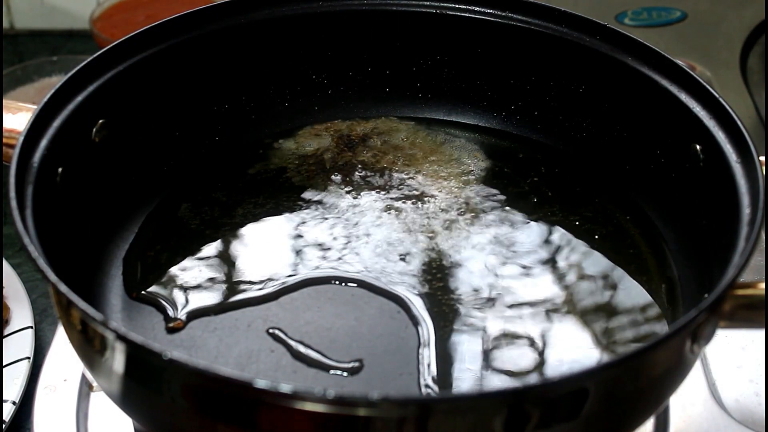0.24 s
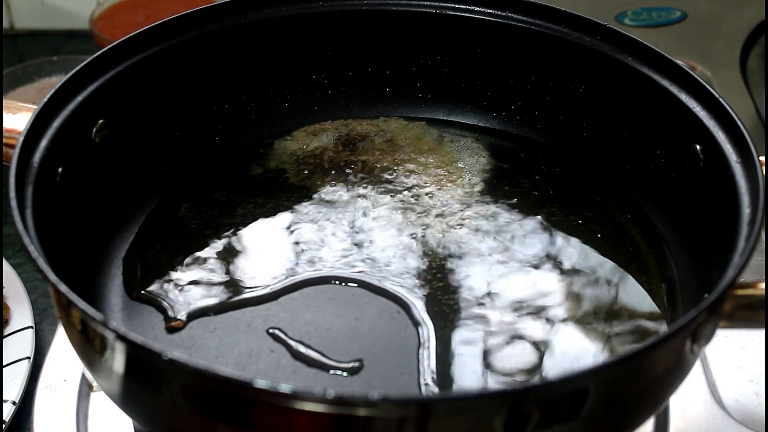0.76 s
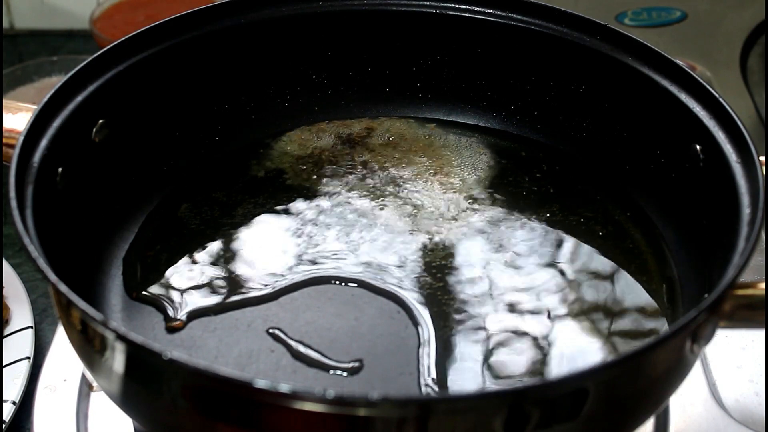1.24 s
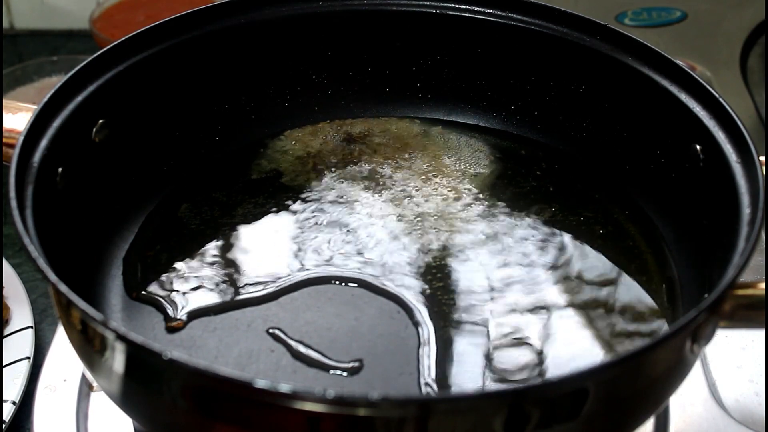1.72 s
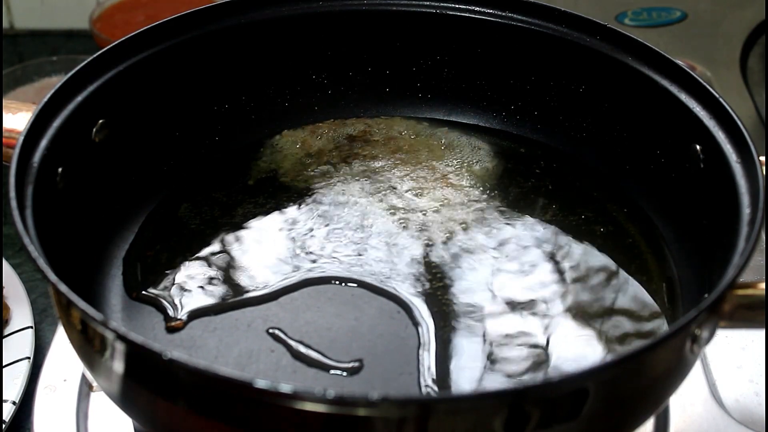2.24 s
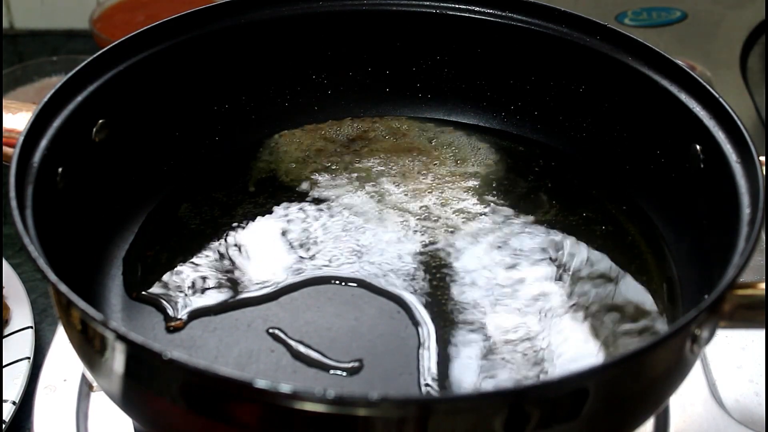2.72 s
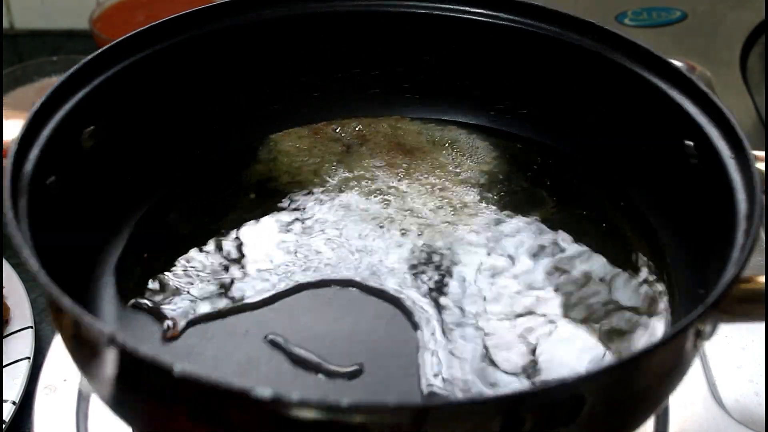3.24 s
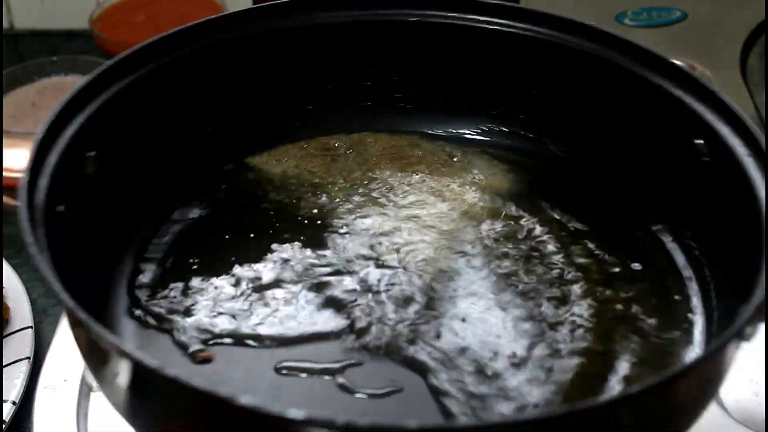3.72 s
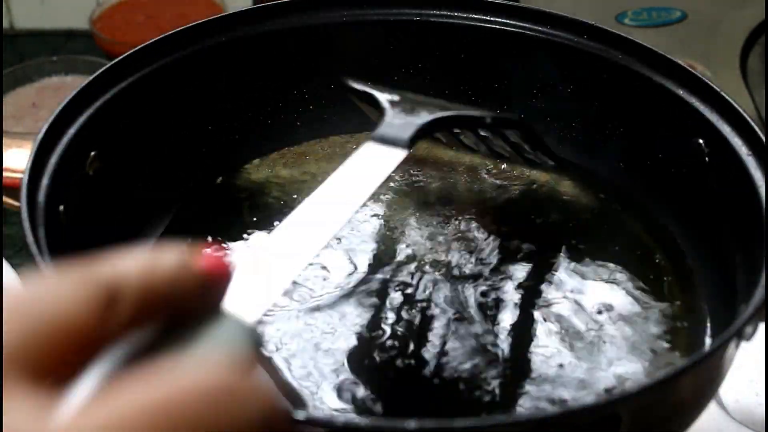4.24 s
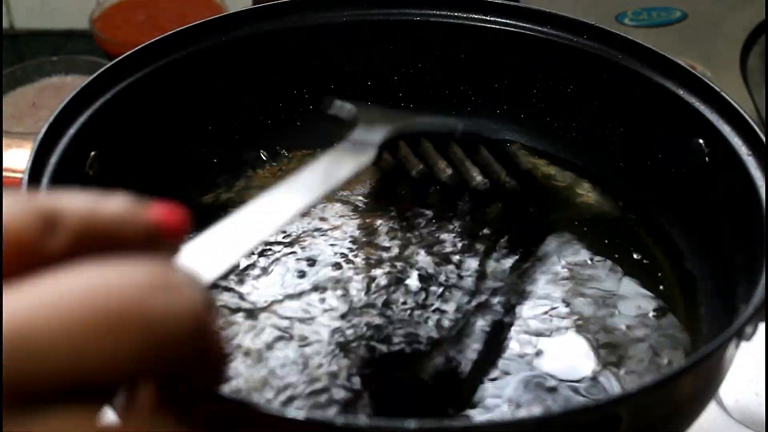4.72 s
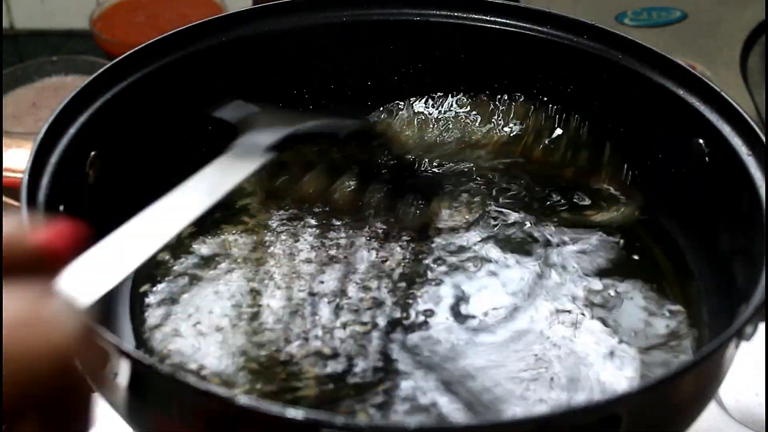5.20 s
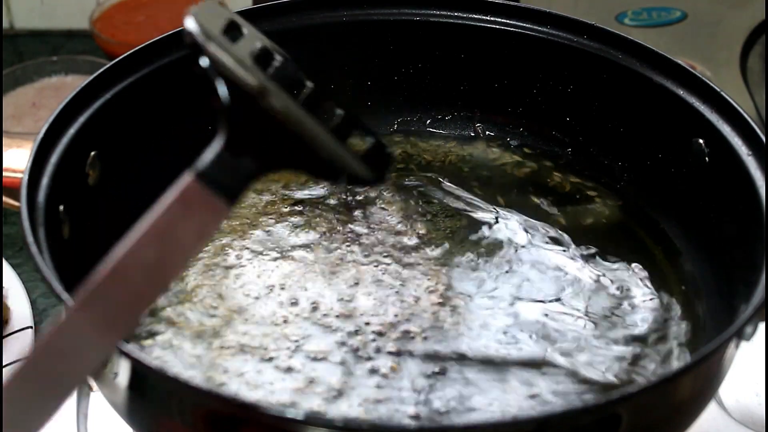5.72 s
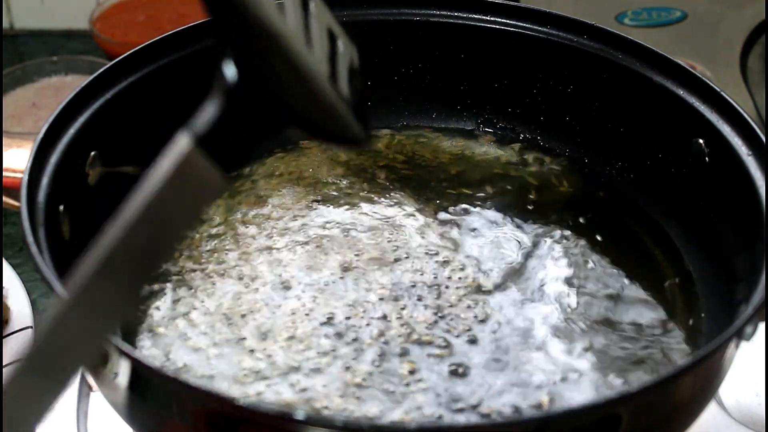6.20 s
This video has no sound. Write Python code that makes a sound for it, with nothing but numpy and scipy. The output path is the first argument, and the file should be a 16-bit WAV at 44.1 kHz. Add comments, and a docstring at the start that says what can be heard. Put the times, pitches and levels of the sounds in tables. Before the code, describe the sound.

Patchy bright sizzling of seeds in oil, a clatter of metal knocks midway, then crisp crackling bursts and a few very loud pops.

```python
"""First comes the uneven fizz of hot oil: seeds fry in a pan, close to a small camera in a hard-walled kitchen.
Steam bubbles make hiss and ticks, bursting seeds make clicks, and spitting oil makes soft clumps of noise.
The pan knocks on the stove grate as it is tilted and a spatula spreads the seeds; struck metal rings.
Metal squeaks by sticking and slipping. Two thin whistles and short fuzzy tones are narrow bands of noise.
A blotchy rustle comes and goes further off, over a low room hush; loud blows make the gain sink."""
import sys
import numpy as np
from scipy import signal
from scipy.io import wavfile
from scipy.ndimage import uniform_filter1d

SR = 44100
rng = np.random.default_rng(int(sys.argv[2]) if len(sys.argv) > 2 else 0)


def dump(signal):
    """Clip the signal to [-1, 1] and save it as 16-bit WAV at the path in sys.argv[1]."""
    limited = np.clip(np.atleast_2d(signal).T, -1, 1)
    pcm = np.round(limited * 32767).astype(np.int16)
    wavfile.write(sys.argv[1], SR, pcm)


N = 284886  # length in samples
BINS = np.fft.rfftfreq(2048, 1 / SR)  # frequencies in Hz at which a click's colour is drawn


def gain_of(db):
    """Turns decibels into a factor for the wave."""
    return 10 ** (np.asarray(db) / 20)


def evened(x):
    """Scales a signal to an RMS level of 1."""
    return x / np.sqrt(np.mean(x ** 2) + 1e-20)


def read(points, hz):
    """Reads a table of (frequency, value) at any frequency, along a log axis."""
    f, value = np.transpose(points)
    return np.interp(np.log(hz + 1), np.log(f + 1), value)


def curve(rows, t):
    """Joins the rows of a time table with straight lines, one curve per column."""
    s, *columns = np.transpose(rows)
    return [np.interp(t, s, c) for c in columns]


def add(mix, s, sound):
    """Adds a sound into the mix at s seconds, cutting it at the end."""
    part = mix[..., round(s * SR):][..., :sound.shape[-1]]
    part += sound[..., :part.shape[-1]]


def bell_db(hz, centre_hz, octaves):
    """A rounded hump on a log-frequency axis, 6 dB down at the given spread in octaves."""
    return -6 * (np.log2((hz + 1) / centre_hz) / octaves) ** 2


def spell_db(t, start, hold, rise, fall):
    """0 dB while it holds; 20 dB down at rise before and at fall after."""
    before = (start - t) / rise
    after = (t - start - hold) / fall
    return -20 * np.maximum(np.maximum(before, after), 0)


# how alike diffuse sound is left and right: f/Hz, likeness [0 to 1]
LEFT_RIGHT_LIKENESS = [(60, 1), (150, 1.0), (380, 1), (950, 1.0), (2380, 1), (5980, 1), (15000, 0.1)]


def diffuse(count, level_db, size=256):
    """Sound from all sides: two-channel noise whose short-time level in dB follows level_db(hz, t)."""
    hop = size // 4
    frames = count // hop + 5
    hz = np.fft.rfftfreq(size, 1 / SR)[:, None]
    t = np.arange(frames) * hop / SR
    a, b, c, d = rng.standard_normal((frames, len(hz), 4)).T
    same = np.clip(read(LEFT_RIGHT_LIKENESS, hz), 0, 1)
    left = a + 1j * b
    right = same * left + np.sqrt(1 - same ** 2) * (c + 1j * d)
    spectrum = np.array([left, right]) * gain_of(level_db(hz, t))
    return signal.istft(spectrum, nperseg=size, noverlap=size - hop)[1][:, :count]


def patches(hz, t, wide, long):
    """Random blotches over time and frequency, spread 1."""
    grain = rng.standard_normal((len(t), len(hz))).T
    blurred = uniform_filter1d(grain, size=wide, axis=0)
    return evened(uniform_filter1d(blurred, size=long, axis=1))


def resonate(x, hz, width):
    """Shifts hz down to zero, smooths, and shifts back: a resonance of gain 1."""
    turn = np.exp(2j * np.pi * np.cumsum(hz * np.ones(len(x))) / SR)
    r = np.exp(-np.pi * width / SR)
    return 2 * (turn * signal.lfilter([1 - r], [1, -r], x / turn)).real


def causal(colour_db):
    """Impulse response with no pre-echo for a colour in dB given on BINS."""
    log_gain = np.maximum(colour_db, -100) * np.log(10) / 20
    circle = np.r_[log_gain, log_gain[-2:0:-1]]
    return np.fft.ifft(np.exp(np.conj(signal.hilbert(circle)))).real


# how long the kitchen echoes: f/Hz, time to fall by 60 dB [s]
KITCHEN_DECAY = [(300, 0.54), (600, 0.22), (1000, 0.35), (2000, 0.28), (6000, 0.28), (12000, .2)]


def in_kitchen(direct, room_db):
    """Direct sound, then its own diffuse tail from the walls, building up over about 2 ms."""
    t = np.arange(SR // 2) / SR
    tail = diffuse(SR // 2, lambda hz, t: -60 * t / read(KITCHEN_DECAY, hz))
    tail *= np.clip(t / 0.0016 - .3, 0, 1)
    wet = signal.fftconvolve(direct[None], tail / np.linalg.norm(tail[0]), axes=1)
    out = gain_of(room_db) * wet
    add(out, 0, direct)
    return out


# frying oil over time: t/s, hiss level/dB, centre of the fizz f/Hz
FIZZ_COURSE = [(0.0, -55.5, 6500), (0.25, -45, 6600), (0.4, -55, 6300), (0.68, -47.5, 6000),
               (0.92, -56, 6200), (1.6, -51.5, 6600), (1.75, -48, 5400), (2.01, -60, 6000),
               (2.34, -52.5, 7600), (2.6, -55.5, 6100), (2.95, -45.5, 6200), (3.12, -60, 6500),
               (3.38, -48, 5200), (3.55, -57.5, 5500), (4.26, -70.5, 7500), (4.43, -60.5, 7800),
               (4.75, -51.5, 7500), (4.95, -53.5, 6500), (5.3, -47, 6400), (5.6, -50.5, 7020),
               (5.76, -68, 7800), (6.08, -56, 6600), (6.22, -80.5, 6500), (6.46, -46, 5800)]
# tone colour of the frying: f/Hz, relative level/dB
FRYING_COLOUR = [(1470, -29.5), (2500, -12.5), (2840, -13.5), (3020, -13.5), (3220, -20.5), (3370, -8),
                 (4110, -11.5), (5250, -8), (5870, -10.5), (7920, -5), (10900, -20), (14000, -40),
                 (16500, -65.5)]
FIZZ_SKIRT_DB = -6  # lowest value of the hump beside its centre


def fizz():
    """Countless tiny steam bubbles merge into patchy hiss; the larger ones stand out as short pitched ticks."""
    def field(hz, t):
        centre = curve(FIZZ_COURSE, t)[1]
        hump = np.maximum(bell_db(hz, centre, 0.5), FIZZ_SKIRT_DB)
        return read(FRYING_COLOUR, hz) + hump + 3.76 * patches(hz, t, wide=5, long=40)
    hiss = evened(diffuse(N, field))
    is_tick = rng.random(N) < 900 / SR  # about 900 ticks a second
    sizes = gain_of(3. * np.minimum(rng.exponential(1, N), 4)) * is_tick
    kind = rng.integers(0, 12, N)  # each tick takes one of 12 pitches
    ticks = np.zeros(N)
    for k, hz in enumerate(np.geomspace(3800, 8500, 12)):
        bubble = causal(bell_db(BINS, hz, .16) + read(FRYING_COLOUR, hz))
        ticks += signal.oaconvolve(sizes * (kind == k), bubble)[:N]
    level = gain_of(curve(FIZZ_COURSE, np.arange(N) / SR)[0])
    return level * (hiss + 0.21 * evened(ticks))


# seeds bursting: t/s, click peak level/dB, centre f/Hz, spread [octaves], room level/dB beside the direct sound
SEED_POPS = [(1.0859, -41, 6600, 0.41, 15.5), (4.7517, -34, 8170, 0.17, -2), (4.794, -28.5, 4060, 0.21, 2),
             (4.8363, -33, 7050, .3, -3), (4.9821, -34, 7000, 0.42, 1), (5.0413, -26, 6400, .4, -3),
             (5.178, -29, 5400, .3, -5), (5.2003, -25, 6800, 0.29, -19), (5.2294, -19, 7000, 0.55, -10),
             (5.24, -30, 3800, .2, 2), (5.2759, -18.5, 6400, 0.42, -19), (5.3594, -21, 6340, 0.42, 5),
             (5.3715, -26, 7300, .2, -6), (5.3779, -25, 5460, 0.6, 4), (5.4872, -31.5, 3740, 0.3, 4),
             (5.5852, -6.5, 7220, 0.58, -5.5), (5.648, -25, 6750, 0.34, -1.5),
             (5.92857, -4.5, 6930, 0.5, -2.5), (5.9605, -14.5, 3830, 0.18, -10.5),
             (5.9851, -15.5, 4420, 0.43, -7), (6.314, -20.5, 5620, 0.4, -3), (6.3979, -33, 7000, 0.33, 6),
             (6.44022, -5.5, 5550, 0.55, -5)]


def pop(db, hz, octaves, room_db):
    """Steam splits the husk: one click with a hump of colour, echoed by the pan wall."""
    treble_loss = 2.6 * np.maximum(BINS - 9500, 0) / 1000  # 2.6 dB per kHz above 9500 Hz
    click = causal(bell_db(BINS, hz, octaves) - treble_loss)
    echoes = rng.standard_normal(400) * (rng.random(400) < .1) * 0.41 * np.exp(-np.arange(400) / 110)
    echoes[:12] = 0  # a short gap before the first echo
    echoes[0] = 1  # the click itself
    direct = signal.fftconvolve(click, echoes)
    return gain_of(db) * in_kitchen(direct / abs(click).max(), room_db)


# pan knocks: t/s, level/dB, body centre f/Hz, spread [octaves], bass level/dB, treble level/dB,
# rattle decay [s], room level/dB beside the direct sound
PAN_KNOCKS = [(0.7988, -13.5, 1608, 0.58, -29, -40, 0.04, 6.5),
              (2.5568, -17, 2520, 0.24, -35.5, -16.5, 0.0016, -3.5),
              (2.8833, -17, 2500, 0.5, -51, 1.5, 0.0057, 0),
              (2.9124, -15, 1650, 0.88, -16.5, -26.5, 0.015, -2),
              (3.5471, -7, 1630, 0.98, -11.5, -13, 0.011, -4),
              (3.6201, -8, 1540, 0.83, -17.5, -16, 0.013, -1.5),
              (3.7242, -4.5, 1630, 0.82, -13, -10, 0.023, -8.5),
              (3.8722, -5.5, 1610, 0.95, -12.5, -8, 0.025, -13.5),
              (3.896, -12, 1980, 0.76, -28, -5, 0.0018, -24.5),
              (3.950, -18.5, 1580, 0.93, -23.5, -11, 0.008, -1.5),
              (4.008, -7, 1550, 0.87, -15, -18.5, 0.028, -5),
              (4.055, -13, 1740, 1.02, -5, -14.5, 0.0066, -1.5),
              (4.895, -29.5, 1327, 0.36, -37, -22, 0.004, 4.5)]
# ringing of the pan: f/Hz, half-width [Hz], relative level/dB
PAN_MODES = [(769, 110, 4), (896, 95, -3), (1180, 260, -13), (1410, 20, -6), (1540, 13, -1), (1740, 56, -7),
             (2021, 54, 2.5), (2490, 21, -23), (3120, 160, -4), (3780, 230, -3.5), (4330, 120, -12.5),
             (5943, 53, 8.5), (8400, 1100, -9.5)]


def knock(db, hz, octaves, bass_db, treble_db, rattle, room_db):
    """A blow and a short rattle of contacts drive the broad body and the modes of the pan."""
    t = np.arange(round(.08 * SR)) / SR
    contacts = rng.laplace(size=len(t)) * (rng.random(len(t)) < .3)
    contacts *= np.minimum(t / .0025, 1) * np.exp(-t / max(rattle, .0005))
    contacts[0] = 3.  # the blow
    modes = sum(gain_of(g) / (1 + ((BINS - f) / w) ** 2) for f, w, g in PAN_MODES)
    body = gain_of(bell_db(BINS, hz, octaves)) + gain_of(treble_db + bell_db(BINS, 6090, 0.38))
    body = body / (1 + (660 / (BINS + 1)) ** 10)  # the pan radiates little below its lowest modes
    body = body + gain_of(bass_db + bell_db(BINS, 540, 0.63))
    colour = 20 * np.log10(body * (0.9 + 0.89 * modes))
    sound = in_kitchen(signal.fftconvolve(contacts, causal(colour)), room_db)
    # the first 30 ms get an RMS level 13 dB under db: steadier than a single peak
    return gain_of(db - 13) * sound / np.sqrt(np.mean(sound[:, :1300] ** 2))


# a clean ring of a metal handle after one knock: t/s, f/Hz, starting level/dB, time to fall by 60 dB [s]
HANDLE_RING = (2.8845, 2516, -27, .22)


def ring(hz, db, t60):
    """One struck mode of the metal dying away: a fading sine."""
    t = np.arange(round(t60 * SR)) / SR
    return gain_of(db - 60 * t / t60) * np.sin(2 * np.pi * hz * t)


# metal squeaks: start t/s, length [s], top partial f/Hz, its level/dB before the fade, lower partials level/dB
# relative to it at the start
METAL_SQUEAKS = [(.64, 0.044, 6240, -30.5, -10), (0.669, 0.099, 6376, -29, -15.5),
                 (1.069, .14, 6380, -36.5, -45), (5.05, 0.082, 6600, -43, -33),
                 (5.447, 0.13, 6470, -39, -40)]
SQUEAK_RISE_S, SQUEAK_FADE_DB = 0.016, -21.5  # time to rise, fade by the end
SQUEAK_LOWER_HOLD = 0.57  # share of the fade that the lower partials escape
SQUEAK_BEND, SQUEAK_BEND_S = 0.0203, 0.019  # pitch starts low by this share and settles in this time


def squeak(length, hz, db, lower_db):
    """Stick-slip of metal on metal: three slightly unsteady partials, the lower two fading less."""
    t = np.arange(0, length, 1 / SR)
    grain = rng.standard_normal((2, SR // 5))
    pitch_slips, level_slips = evened(uniform_filter1d(grain, size=150, axis=1))[:, :len(t)]
    bend = 1 - SQUEAK_BEND * np.exp(-t / SQUEAK_BEND_S)
    turn = 2 * np.pi * np.cumsum(hz * bend * (1 + 0.0064 * pitch_slips)) / SR
    lower = np.sin(turn / 3) + .9 * np.sin(2 * turn / 3)
    fade_db = SQUEAK_FADE_DB * t / length
    stack = np.sin(turn) + gain_of(lower_db - SQUEAK_LOWER_HOLD * fade_db) * lower
    shape = np.minimum(t / SQUEAK_RISE_S, 1) * gain_of(fade_db)
    return gain_of(db + 2 * level_slips) * shape * stack * signal.windows.tukey(len(t), .1)


# soft bursts of spitting oil, most as the spatula swishes through:
# t/s, length [s], centre f/Hz, width of each filter pass [Hz], level/dB before the fade
OIL_SWISHES = [(0.131, 0.061, 7060, 3000, -48), (0.223, 0.034, 6500, 2950, -37.5),
               (4.793, 0.056, 4970, 2000, -44.5), (5.001, 0.13, 6370, 2770, -39.5),
               (5.02, 0.092, 5130, 2440, -38.5), (5.161, 0.032, 5570, 2470, -40.5),
               (5.211, 0.11, 6740, 3500, -45), (5.388, 0.051, 5220, 2980, -34),
               (5.496, 0.052, 6000, 3000, -41.5)]
SPIT_DB, SPIT_S = 1.5, 0.00061  # clumps of spitting: spread of their level, their length


def swish(length, hz, width, db):
    """A wide band of noise broken into short clumps of droplets."""
    band = tone(length, hz, width, db)
    smooth = uniform_filter1d(rng.standard_normal(SR // 5), round(SPIT_S * SR))
    clumps = gain_of(SPIT_DB * evened(smooth))
    return band * evened(clumps)[:len(band)]


# fuzzy narrow tones: t/s, length [s], f/Hz, width of each filter pass [Hz], level/dB before the fade
FUZZY_TONES = [(0.139, 0.083, 192, 68, -57.5), (0.304, 0.058, 1670, 36, -50.5),
               (0.468, 0.079, 1636, 61, -48), (0.692, 0.027, 4440, 260, -35.5),
               (0.928, 0.11, 1662, 45, -43), (1.093, 0.31, 3226, 151.2, -54),
               (1.152, 0.13, 1663, 38.89, -59.5), (1.216, 0.17, 2920, 129.6, -53),
               (1.693, 0.2, 5230, 594, -50.5), (2.139, .13, 1168, 237.6, -43.5),
               (2.781, 0.057, 6300, 324, -44), (4.764, 0.082, 1160, 629.6, -52.5),
               (4.831, .05, 1050, 410.4, -50), (5.456, 0.095, 3340, 184, -46.5),
               (5.737, 0.11, 1584, 44.7, -67), (6.409, 0.052, 2770, 540, -44),
               (6.261, 0.092, 1598, 28, -55.5), (6.262, 0.11, 943, 35.64, -58)]


def tone(length, hz, width, db):
    """A band of noise, filtered three times, that starts quickly and fades."""
    t = np.arange(round(length * SR)) / SR
    band = rng.standard_normal(len(t))
    for _ in range(3):
        band = resonate(band, hz, width)
    return gain_of(db) * evened(band) * signal.windows.tukey(len(t), .4) * np.exp(-t / length)


# spells of the thin whistles: start t/s, hold [s], upper tone level/dB, lower tone level/dB relative to it
WHISTLE_SPELLS = [(0.03, 0.16, -59.5, -5.5), (0.233, 0.12, -58, -5.5), (0.507, 0.063, -59.5, -1),
                  (0.716, 0.31, -61.5, -7), (1, 0.1, -54.5, -5.5), (1.307, 0.19, -57.5, -1),
                  (1.558, 0.13, -60, 0), (2.911, 0.068, -43.5, -3.5), (3.163, 0.68, -58, -9.5),
                  (4.155, 0.033, -66.5, -4), (4.36, .3, -74, -2), (4.945, 0.53, -66, -7),
                  (5.863, 0.066, -66.5, -10.5)]
# pitch of the upper tone: t/s, f/Hz
WHISTLE_PITCH = [(0, 3445), (1.9, 3450), (2.9, 3420), (3.2, 3392), (6.46, 3395)]
# the two tones: share of the upper pitch, width of each filter pass [Hz]
WHISTLE_PAIR = [(1, 55), (.879, 110)]
WHISTLE_RISE_S, WHISTLE_FALL_S = .03, 0.23  # over 20 dB


def whistles():
    """Two narrow bands of noise that come in spells, wavering a little in level."""
    t = np.arange(N) / SR
    upper, lower = np.zeros(N), np.zeros(N)
    for start, hold, db, lower_db in WHISTLE_SPELLS:
        spell = gain_of(db + spell_db(t, start, hold, WHISTLE_RISE_S, WHISTLE_FALL_S))
        upper += spell
        lower += spell * gain_of(lower_db)
    hz = curve(WHISTLE_PITCH, t)[0]
    out = np.zeros(N)
    for (share, width), level in zip(WHISTLE_PAIR, (upper, lower)):
        smooth = uniform_filter1d(rng.standard_normal(N), size=900)
        waver = evened(uniform_filter1d(smooth, size=900))
        band = resonate(rng.standard_normal(N), share * hz, width)
        band = resonate(band, share * hz, width)
        out += level * gain_of(1.5 * waver) * evened(band)
    return out


# swells of rustle further off: start t/s, hold [s], level/dB, centre f/Hz, spread [octaves]
RUSTLE_SWELLS = [(0.172, .07, -53.5, 1300, 0.53), (0.33, 0.12, -57, 1450, .6),
                 (0.498, 0.13, -57, 1600, 0.62), (0.685, .14, -54.5, 1850, 0.77),
                 (0.968, 0.25, -59.5, 1720, 0.62), (1.513, 0.31, -63.5, 1350, 0.88),
                 (1.952, 0.28, -61.5, 1080, 0.69), (2.459, 0.25, -57.5, 1450, 0.55),
                 (2.817, 0.14, -59.5, 1170, 0.33), (3.0, 0.095, -56, 1370, 0.77),
                 (3.326, 0.072, -59.5, 1550, 0.57), (5.238, 0.053, -56.5, 1490, 0.77),
                 (5.531, 0.052, -58, 1570, 0.77), (5.73, .1, -65, 1300, 0.44),
                 (5.845, .09, -58, 1640, 0.39), (6.204, .06, -66, 1640, 0.38),
                 (6.289, 0.078, -58.5, 1370, 0.59)]
# faint bed under the swells: t/s, level/dB
RUSTLE_BED_LEVEL = [(0, -66), (1.2, -62.5), (4.2, -67.5), (4.26, -78.5), (6.46, -80.5)]
RUSTLE_BED_HZ, RUSTLE_OCTAVES = 1190, 0.66  # centre and spread of the bed
RUSTLE_RISE_S, RUSTLE_FALL_S = 0.022, 0.1  # over 20 dB


def rustle():
    """Blotchy mid-band noise: swells of their own colour over a faint bed."""
    def field(hz, t):
        def hump(db, centre, octaves):
            # a wider hump is made lower, so that its total power stays the same
            narrowness = RUSTLE_BED_HZ * RUSTLE_OCTAVES / (centre * octaves)
            return gain_of(db + bell_db(hz, centre, octaves)) ** 2 * narrowness
        power = hump(curve(RUSTLE_BED_LEVEL, t)[0], RUSTLE_BED_HZ, RUSTLE_OCTAVES)
        for start, hold, db, *colour in RUSTLE_SWELLS:
            swell_db = db + spell_db(t, start, hold, RUSTLE_RISE_S, RUSTLE_FALL_S)
            power = power + hump(swell_db, *colour)
        return 10 * np.log10(power + 1e-30) + 3.7 * patches(hz, t, wide=3, long=10)
    # one second of steady bed noise gives the strength that counts as 0 dB
    unit = diffuse(SR, lambda hz, t: bell_db(hz, RUSTLE_BED_HZ, RUSTLE_OCTAVES), size=1024)
    return diffuse(N, field, size=1024) / unit.std()


# tone colour of the room hush: f/Hz, relative level/dB
HUSH_COLOUR = [(15, -41.5), (30, -19.5), (80, -6.5), (180, 5.5), (313, 2), (450, 4.5), (726, -1.5),
               (1390, -3.5), (1680, -18.5), (2750, -8.5), (5570, -19.5), (7510, -10.5), (11000, -11),
               (14500, -26), (16500, -48)]
# loudness of the hush: t/s, level/dB
HUSH_COURSE = [(0.0, -65.5), (2.85, -66), (3.05, -61), (3.3, -65.5), (3.52, -59.5), (4.25, -68),
               (5.28, -67), (5.9, -72.5), (6.15, -72), (6.3, -65), (6.46, -63.5)]


def hush():
    """Low room hush: coloured noise that swells and sinks as a whole."""
    def field(hz, t):
        return read(HUSH_COLOUR, hz) + 2 * patches(hz, t, wide=20, long=8)
    level = gain_of(curve(HUSH_COURSE, np.arange(N) / SR)[0])
    return level * evened(diffuse(N, field, size=1024))


def scene():
    """Lays the single sounds over the four steady layers."""
    mix = fizz() + whistles() + rustle() + hush()
    for s, *row in SEED_POPS:
        add(mix, s, pop(*row))
    for s, *row in PAN_KNOCKS:
        add(mix, s, knock(*row))
    add(mix, HANDLE_RING[0], in_kitchen(ring(*HANDLE_RING[1:]), -3))
    for s, *row in METAL_SQUEAKS:
        add(mix, s, in_kitchen(squeak(*row), -6))
    for sound, rows in (swish, OIL_SWISHES), (tone, FUZZY_TONES):
        for s, *row in rows:
            add(mix, s, in_kitchen(sound(*row), -5))
    return mix


# full-band cracks, where the wave jumps for two samples:
# approximate t/s, jump on the left, jump on the right [wave height, before the limit]
WAVE_CRACKS = [(3.72575, -1.25, -1.2), (5.92877, 1.05, 0), (6.44047, .72, 0)]
EDGE_HZ = 16800  # upper edge of the band


def record(dry):
    """The left port hears one sample late; gain control ducks all after loud blows; then cracks, limit, band edge."""
    ports = np.array([np.r_[0, dry[0, :-1]], dry[1]])
    power_db = 10 * np.log10(abs(uniform_filter1d((ports ** 2).mean(0), size=600)) + 1e-12)
    fall = np.arange(N) * 22.0 / SR  # the held level recovers by 22 dB a second
    held_db = np.maximum.accumulate(power_db + fall) - fall
    over_db = np.maximum(held_db + 10.5, 0)  # excess above -10.5 dB
    # the gain sinks late and slowly, so attacks pass and tails are cut short
    late = signal.lfilter([1 / 5000], [1, 1 / 5000 - 1], over_db)
    ducked = ports / gain_of(0.51 * late)
    for s, *heights in WAVE_CRACKS:
        # the left wave flips over where it swings furthest against the jump
        near = ducked[0, round(s * SR) - 30:][:60]
        at = np.argmin(heights[0] * (near[:-1] + near[1:])) - 30
        add(ducked, s + at / SR, np.outer(heights, np.ones(2)))
    ducked = np.clip(ducked, -.68, .68)  # the converter's limit
    band_edge = signal.firwin(511, EDGE_HZ, window=("kaiser", 9), fs=SR)
    return signal.oaconvolve(ducked, band_edge[None], "same")


dry = scene()
out = record(dry)
dump(out)
```